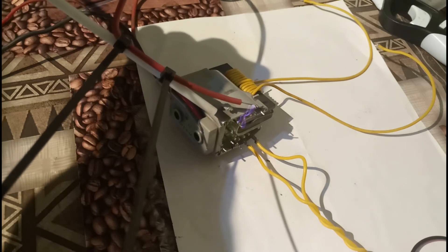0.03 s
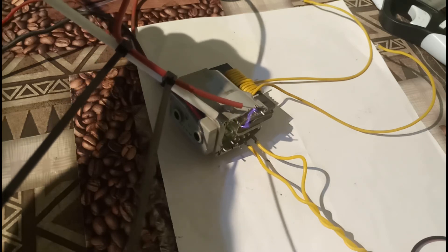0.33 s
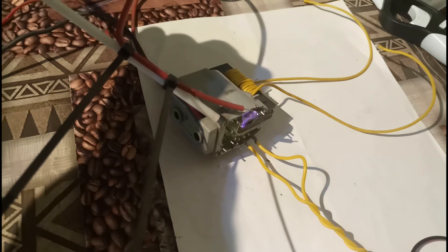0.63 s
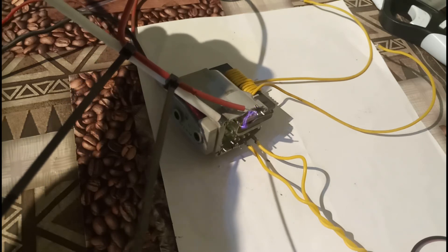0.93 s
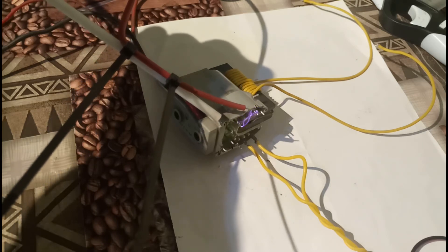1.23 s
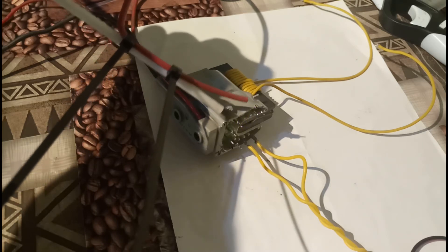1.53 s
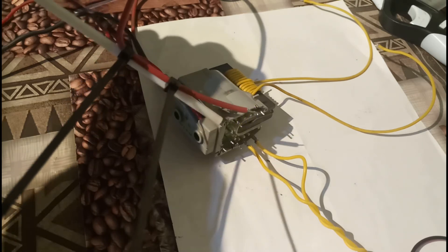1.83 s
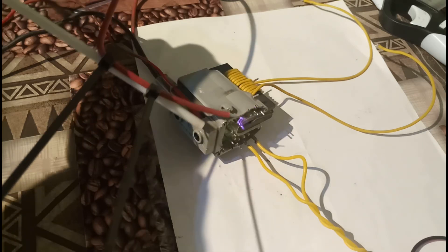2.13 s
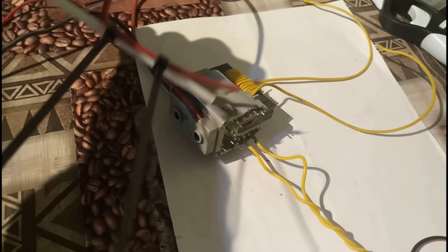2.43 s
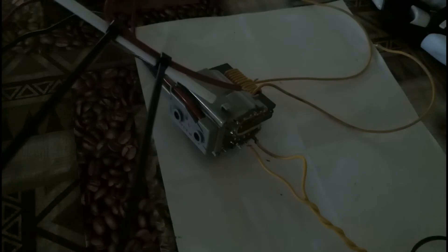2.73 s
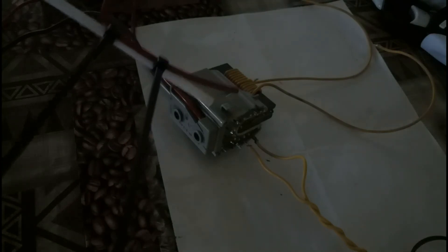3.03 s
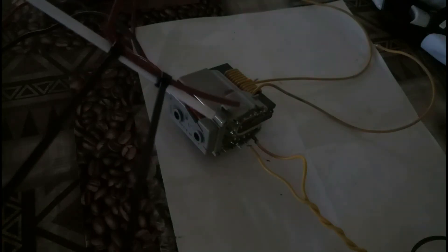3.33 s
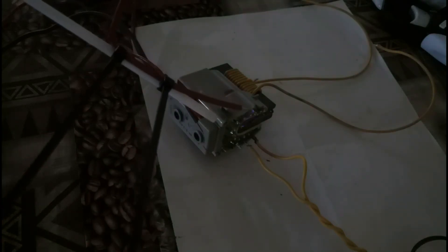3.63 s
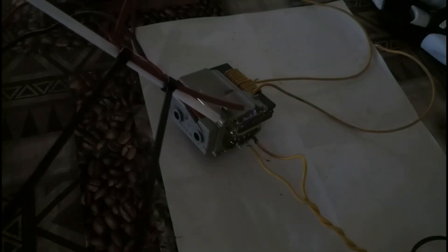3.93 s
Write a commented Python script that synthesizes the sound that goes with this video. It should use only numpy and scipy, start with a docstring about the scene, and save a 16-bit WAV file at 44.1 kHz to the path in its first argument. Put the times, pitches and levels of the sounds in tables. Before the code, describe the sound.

Crackling, buzzing electric arc on a small transformer, then a switch click and faint fizz.

```python
"""Mains arc on a small transformer.

An arc burns on a table: a spark cluster every half cycle, with louder snaps that ring the case.
It dies to a corona fizz, strikes again and goes out. A switch clacks; later a thin corona buzz returns.
A small room rings behind it. The core hums; a low drone, probably an engine outside, climbs and falls."""
import sys
import numpy as np
from scipy import signal
from scipy.fft import rfft, irfft, next_fast_len
from scipy.io import wavfile
from scipy.ndimage import uniform_filter1d

SR = 44100
rng = np.random.default_rng(int(sys.argv[2]) if len(sys.argv) > 2 else 0)


def file_out(sig):
    """Save sig as 16-bit WAV at sys.argv[1]."""
    # one column per channel
    cols = np.atleast_2d(sig).T
    # limit, then scale
    lim = np.clip(cols, -1, 1)
    pcm = np.round(lim * 32767).astype(np.int16)
    wavfile.write(sys.argv[1], SR, pcm)


N = 176400

# Room tone spectrum. Each row: frequency in Hz, relative level in dB.
AIR_SPECTRUM = [(25, -15), (50, -28.5), (85, 2), (115, -4), (170, -15), (300, -17.5), (600, -23),
                (1200, -27), (2300, -31), (6200, -34.5), (7600, -29), (10000, -34), (15500, -35)]
# Engine rumble spectrum. Each row: frequency in Hz, relative level in dB.
RUMBLE_SPECTRUM = [(15, 2.5), (28, -5), (42, -15), (90, -1), (150, -1.5), (300, -24), (600, -21),
                   (1500, -53.5), (5000, -73.5)]
# Engine run. Each row: time in seconds, fundamental in Hz, its level in dB, octave level in dB.
DRONE_TRACK = [(0, 61.5, -54, -42), (.17, 61.8, -66, -39), (.27, 62.6, -53, -35.5), (.4, 62.26, -51, -38),
               (.78, 64.3, -47.5, -32.5), (1.12, 66.1, -49.5, -39), (1.3, 66.4, -45.5, -56),
               (1.57, 68.4, -49, -45), (1.78, 69.2, -57, -53), (1.97, 69.7, -62, -51),
               (2.08, 69.2, -71, -73), (2.26, 63.66, -53, -52.5), (2.4, 61.7, -52.5, -51.5),
               (2.56, 57.53, -60, -47), (2.75, 50.7, -56.5, -56), (2.95, 49.3, -74, -77.5),
               (3.3, 46, -89.5, -88), (3.7, 40, -84, -68), (4, 45, -62, -78)]
# Core hum under load. Each row: frequency in Hz, level in dB.
HUM_PARTIALS = [(100, -60.5), (200, -66.5)]
# Room decay. Each row: frequency in Hz, T60 in seconds.
ROOM_DECAY = [(150, 0.73), (800, 0.51), (3500, 0.45), (7000, 0.42), (14000, 0.3)]
# Switch contact hits. Each row: time in seconds, relative level in dB.
CONTACT_HITS = [(2.633, -20), (2.6421, -6), (2.6431, -8.5), (2.6445, -10), (2.6453, -1)]
# Switch body spectrum. Each row: frequency in Hz, relative level in dB.
CLACK_SPECTRUM = [(80, -15), (300, -19), (500, -5.5), (780, 6.5), (1000, -3.5), (1400, -13), (2200, -15.5),
                  (2550, -6), (3700, -7.5), (5000, -4.5), (6200, -2.5), (6950, 8), (8200, -1.5),
                  (9400, 4.5), (10400, -9), (13000, -13), (16000, -23)]
# Switch and plate modes. Each row: frequency in Hz, relative level in dB, T60 in seconds.
PLATE_MODES = [(490, -19.5, 0.37), (735, -10.5, 0.38), (790, -27, 0.4), (870, -17, .4), (983, -19.5, 0.61),
               (6891, -3, 0.104), (7260, -18, .15), (9372, -16, 0.09)]
# Corona strength, one list per spell. Each row: time in seconds, level in dB.
CORONA_SPELLS = [
    [(1.505, -52), (1.56, -47.5), (1.64, -45), (1.674, -53.5)],
    [(2.028, -52.5), (2.06, -43.5), (2.11, -44.5), (2.14, -47), (2.2, -61), (2.45, -68), (2.5, -46),
     (2.53, -56)],
    [(3.498, -55.5), (3.515, -52), (3.532, -61), (3.542, -50), (3.557, -66)],
    [(3.598, -66), (3.63, -51.5), (3.68, -52), (3.692, -63), (3.715, -50.5), (3.8, -49.5), (4.0, -51)],
]
# Corona spectrum. Each row: frequency in Hz, relative level in dB.
CORONA_SPECTRUM = [(100, -11), (900, -16), (1900, -18), (2400, -13.5), (3050, -6.5), (3600, -9.5),
                   (4300, -6), (5000, -2.5), (9300, 2), (12200, -7), (15000, -3), (16000, -0.5)]
# Hard breakdowns. Each row: start in seconds, relative level in dB.
SNAP_EVENTS = [(0.0094, -15.5), (0.0501, -12.5), (0.071, -18.5), (0.0895, -12), (0.1492, -11),
               (0.1695, -17), (0.2005, -12.5), (0.2104, -17), (0.2208, -15), (0.2398, -10), (0.2619, -17.5),
               (0.2795, -11), (0.2993, -18), (0.3104, -13.5), (0.3498, -13.5), (0.4196, -23.5),
               (0.4304, -19), (0.4617, -24), (0.4703, -34), (0.5115, -17.5), (0.5304, -20), (0.5696, -16.5),
               (0.7078, -12), (0.7483, -14.5), (0.8222, -11.5), (0.8685, -15), (0.8824, -22), (0.9779, -22),
               (0.9901, -23), (1.028, -27), (1.07, -17), (1.1276, -16), (1.2299, -18), (1.3905, -13.5),
               (1.411, -16), (1.4706, -15), (1.48, -14.5), (1.4994, -20.5), (2.0716, -17), (2.151, -15.5),
               (2.1594, -15.5), (2.169, -15.5), (2.1885, -15.5), (2.2185, -22.5), (2.2297, -17),
               (2.358, -22.5), (2.3783, -19), (2.4398, -30)]
# Case ring under snaps. Each row: frequency in Hz, gain on the spark spectrum in dB.
CASE_RING = [(200, -7.5), (1000, -3), (3000, -2), (6000, 0), (8000, 0), (9400, 1), (11000, -1.5),
             (13000, 3.5), (16000, 0)]
# Arc strength, one list per burn. Each row: time in seconds, level in dB.
ARC_BURNS = [
    [(0.0, -42.5), (0.12, -33.5), (0.19, -39), (0.22, -37), (0.33, -34.5), (0.6, -34), (0.82, -35),
     (0.89, -34.5), (0.92, -35), (1.2, -36), (1.26, -33), (1.505, -35)],
    [(2.152, -36), (2.25, -35.5), (2.29, -41.5), (2.33, -41), (2.37, -32.5), (2.41, -38), (2.447, -34)],
]
# Spark spectrum. Each row: frequency in Hz, relative level in dB.
SPARK_SPECTRUM = [(60, -8), (200, -1), (300, -4.5), (520, -1.5), (680, -8), (900, -6.5), (1600, -8.5),
                  (2100, -14), (2500, -9.5), (3050, -4), (3600, -10), (4200, -4.5), (5400, -3.5), (6600, 0),
                  (7700, -3), (9300, 2.5), (12200, -2), (13400, -1.5), (14700, 5.5), (16000, -12)]
# Stereo width of a discharge. Each row: frequency in Hz, side over mid in dB.
SPARK_WIDTH = [(200, -20.5), (1500, -11.5), (2300, -4.5), (4700, -10), (6500, -6), (7900, -2), (9200, -19),
               (11300, -7.5), (12800, 0.5), (15500, 1)]
# Spark path, left microphone against right. Each row: frequency in Hz, level in dB, lag in radians.
MIC_BALANCE = [(98.8, 1.5, -4), (380.5, -2.5, 0.95), (1100, -4, 0.85), (1800, -5, 1.3), (2250, -3.5, 3.5),
               (2900, -8.5, 2), (3750, -7.5, 2.5), (5420, -0.5, 3.5), (6100, -1, 5), (8000, 3, 7),
               (9300, -3.5, 5.5), (12200, -1, 6), (13630, -1.5, 10), (15500, 2.5, 10.5)]

HALF_CYCLE_HZ, STREAMER_S = 100, .00024
ROOM_GAP_S, EARLY_DECAY_S, EARLY_DB, ARC_ROOM_DB = .0037, .0041, -2, -9
SWITCH_OFF_S = CONTACT_HITS[1][0]
SIDE_SIGNS = np.array([[1], [-1]])


def amp(db):
    """dB to gain."""
    return 10 ** (np.asarray(db) / 20)


def over_hz(points, hz):
    """Interpolate (Hz, value) rows on a log axis."""
    knots_hz, values = np.array(points, float).T
    return np.interp(np.log(hz + 1), np.log(knots_hz), values)


def unit(x):
    """Scale to unit energy."""
    return x / np.sqrt(np.sum(x ** 2, axis=-1, keepdims=True))


def response(spectrum, size=2048):
    """Minimum-phase impulse response of (Hz, dB) rows."""
    hz = np.arange(size // 2 + 1) * SR / size
    cepstrum = irfft(np.log(amp(over_hz(spectrum, hz))))
    cepstrum[1:size // 2] *= 2
    cepstrum[size // 2 + 1:] = 0
    return irfft(np.exp(rfft(cepstrum)))


def convolve(x, ir):
    """Convolve per channel, cut to N samples."""
    return signal.fftconvolve(np.atleast_2d(x), np.atleast_2d(ir), axes=-1)[:, :N]


def impulses(times_s, gains):
    """One impulse per time."""
    at = np.round(np.ravel(times_s) * SR).astype(int)
    inside = (at >= 0) & (at < N)
    return np.bincount(at[inside], np.ravel(gains)[inside], N)


def pan(left_over_right_db):
    """Left and right gains."""
    return amp(SIDE_SIGNS * left_over_right_db / 2)


def diffuse(ir):
    """Reflections reach both microphones alike in the bass, apart in the treble."""
    side = signal.sosfilt(signal.butter(1, 1100, "high", fs=SR, output="sos"), ir[1])
    return unit(ir[0] + side * SIDE_SIGNS)


def room(x):
    """Diffuse room tail, shorter in the treble."""
    hz, age_s, noise = signal.stft(rng.standard_normal((2, SR)), SR, nperseg=256)
    decay = np.exp(-np.log(1000) * age_s / over_hz(ROOM_DECAY, hz)[:, None])
    tail = signal.istft(noise * decay, SR)[1]
    onset = np.clip(np.arange(tail.shape[1]) / SR / ROOM_GAP_S - 1, 0, 1)
    return convolve(x, diffuse(tail * onset))


def room_tone(gain_db=-66):
    """Quiet air noise, near mono in the bass."""
    mid, side = convolve(rng.standard_normal((2, N)), unit(response(AIR_SPECTRUM, size=8192)))
    side = signal.sosfilt(signal.butter(1, 700, "high", fs=SR, output="sos"), side)
    return amp(gain_db) * (mid + amp(1) * side * SIDE_SIGNS)


def engine_drone(t, rumble_db=-11):
    """Two low engine orders rise and sink together over a soft rumble."""
    knots_s, hz, low_db, octave_db = np.array(DRONE_TRACK).T
    phase = 2 * np.pi * np.cumsum(np.interp(t, knots_s, hz)) / SR
    low, octave = amp(np.interp(t, knots_s, low_db)), amp(np.interp(t, knots_s, octave_db))
    orders = np.sqrt(2) * (low * np.sin(phase) + octave * np.sin(2 * phase))
    rumble = convolve(rng.standard_normal(N), unit(response(RUMBLE_SPECTRUM, size=8192)))
    return orders + amp(rumble_db) * np.hypot(low, octave) * rumble


def core_hum(t, idle_db=-19.5):
    """The transformer core hums, sinking to idle when the switch is thrown."""
    load = uniform_filter1d(np.where(t < SWITCH_OFF_S, 1., amp(idle_db)), size=4000)
    return load * sum(np.sqrt(2) * amp(db) * np.sin(2 * np.pi * (hz * t + rng.random()))
                      for hz, db in HUM_PARTIALS)


def switch(gain_db=-4.5, room_db=6.5):
    """A switch on the left snaps over: contacts bounce, the plate rings, the room answers."""
    t = np.arange(SR // 2) / SR
    hits_s, hits_db = np.array(CONTACT_HITS).T
    blows = impulses(hits_s, amp(hits_db + gain_db))
    body = convolve(blows, unit(response(CLACK_SPECTRUM)))
    ring = sum(amp(db) * unit(np.sin(2 * np.pi * hz * t) * np.exp(-np.log(1000) * t / t60_s))
               for hz, db, t60_s in PLATE_MODES)
    plate = convolve(impulses([SWITCH_OFF_S], [amp(gain_db)]), ring)
    return body * pan(12.5) + (plate + amp(room_db) * room(body)) * pan(1.5)


def crest_discharges(spells, offset_s, spread_s, crest_scatter_db, spark_scatter_db, count):
    """Times and gains of discharges crowding round each voltage crest."""
    crests_s = np.arange(N * HALF_CYCLE_HZ // SR) / HALF_CYCLE_HZ + offset_s
    strength = np.zeros(len(crests_s))
    for spell in spells:
        knots_s, db = np.array(spell).T
        active = (crests_s >= knots_s[0]) & (crests_s <= knots_s[-1])
        strength += amp(np.interp(crests_s, knots_s, db)) * active
    strength *= amp(crest_scatter_db * rng.standard_normal(len(crests_s))) * np.sqrt(SR / HALF_CYCLE_HZ)
    times_s = crests_s[:, None] + spread_s * rng.standard_normal((len(crests_s), count))
    shares = unit(amp(spark_scatter_db * rng.standard_normal(times_s.shape)))
    return times_s, strength[:, None] * shares


def radiate(times_s, gains, spectrum, room_db, size=128):
    """Each discharge is a sputter of about a millisecond, scattered by table and room."""
    times_s, gains = times_s[gains > 0], gains[gains > 0]
    age = np.arange(size) / SR / STREAMER_S
    sputters = unit(rng.standard_normal((2, len(times_s), size)) * age ** 2 * np.exp(-age))
    samples_s = (np.round(times_s * SR)[:, None] + np.arange(size)) / SR
    mid, side = (impulses(samples_s, gains[:, None] * sputter) for sputter in sputters)
    wide = mid + convolve(side, response(SPARK_WIDTH)) * SIDE_SIGNS
    equal_power = [(hz, -10 * np.log10(1 + amp(db) ** 2)) for hz, db in SPARK_WIDTH]
    direct = convolve(wide, response(equal_power))
    scatter = rng.standard_normal((2, 4096)) * np.exp(-np.arange(4096) / SR / EARLY_DECAY_S)
    early = convolve(direct, diffuse(scatter))
    wet = direct + amp(EARLY_DB) * early + amp(room_db) * room(direct)
    return convolve(wet, unit(response(spectrum)))


def mic_shading(x):
    """The recorder's body shifts level and phase between the microphones."""
    size = next_fast_len(N + 2048)
    hz = np.arange(size // 2 + 1) * SR / size
    balance = np.array(MIC_BALANCE)
    db, lag_rad = over_hz(balance[:, [0, 1]], hz), over_hz(balance[:, [0, 2]], hz)
    paths = np.array([amp(db / 2) * np.exp(-1j * lag_rad), amp(-db / 2)])
    return irfft(rfft(x, size) * paths, size)[:, :N]


def corona():
    """Many tiny discharges fizz at each crest while the gap holds."""
    times_s, gains = crest_discharges(CORONA_SPELLS, offset_s=.0021, spread_s=.0009,
                                      crest_scatter_db=1.9, spark_scatter_db=2, count=14)
    return radiate(times_s, gains, CORONA_SPECTRUM, room_db=-8)


def snaps(gain_db=11.5, delay_s=.0002, spread_s=.0017, scatter_db=1.3, count=2):
    """Harder breakdowns, in close pairs, ring the case."""
    starts_s, levels_db = np.array(SNAP_EVENTS).T
    stagger = (np.arange(count) + rng.random((len(starts_s), count))) / count
    times_s = starts_s[:, None] + delay_s + spread_s * stagger
    shares = unit(amp(scatter_db * rng.standard_normal(times_s.shape)))
    spectrum = [(hz, db + over_hz(CASE_RING, hz)) for hz, db in SPARK_SPECTRUM]
    return radiate(times_s, amp(levels_db + gain_db)[:, None] * shares, spectrum, ARC_ROOM_DB)


def arc():
    """Spark clusters at twice the mains rate."""
    times_s, gains = crest_discharges(ARC_BURNS, offset_s=.0008, spread_s=.0016,
                                      crest_scatter_db=2.5, spark_scatter_db=5, count=6)
    return radiate(times_s, gains, SPARK_SPECTRUM, ARC_ROOM_DB)


def scene():
    """Stereo sum of all sources."""
    t = np.arange(N) / SR
    discharges = mic_shading(arc() + snaps() + corona())
    return discharges + switch() + engine_drone(t) + core_hum(t) + room_tone()


def record(dry):
    """Steep low-pass at 15.9 kHz."""
    return signal.sosfilt(signal.ellip(10, .2, 80, 15900, fs=SR, output="sos"), dry)


dry = scene()
out = record(dry)
file_out(out)
```